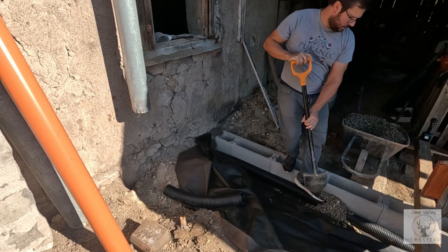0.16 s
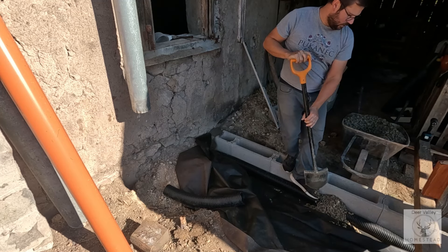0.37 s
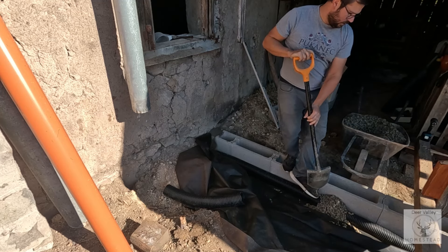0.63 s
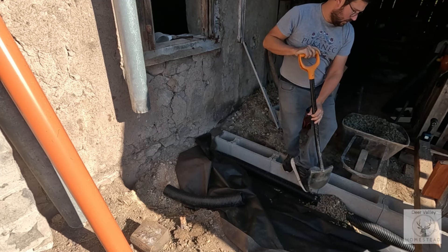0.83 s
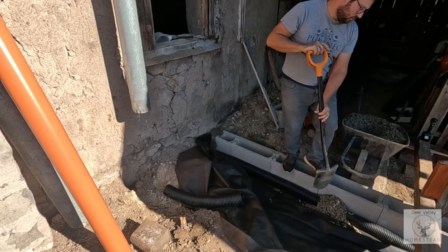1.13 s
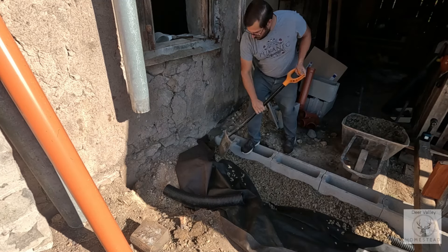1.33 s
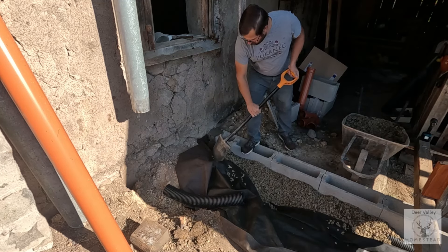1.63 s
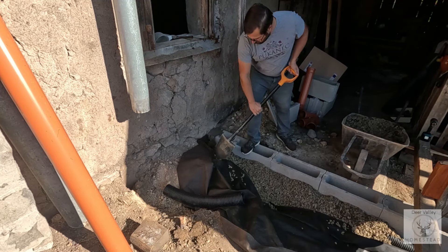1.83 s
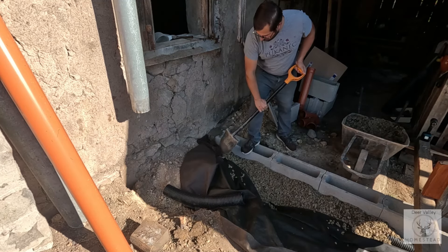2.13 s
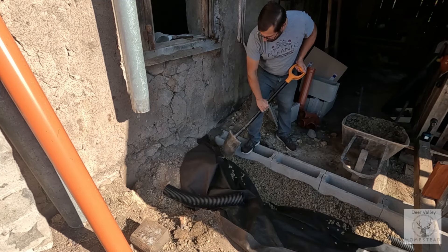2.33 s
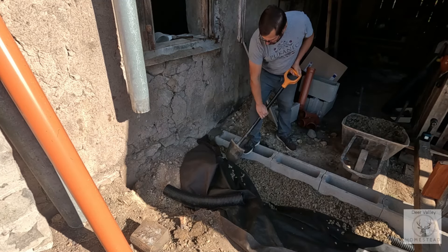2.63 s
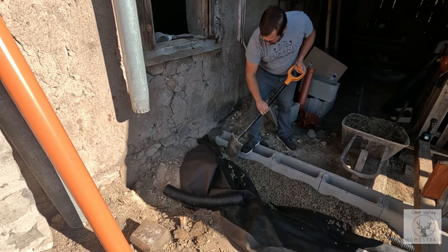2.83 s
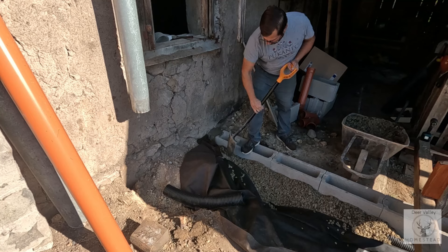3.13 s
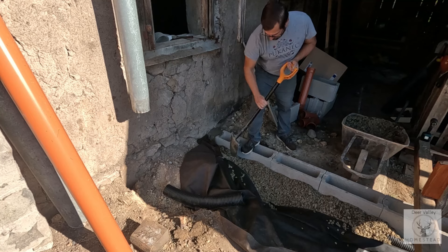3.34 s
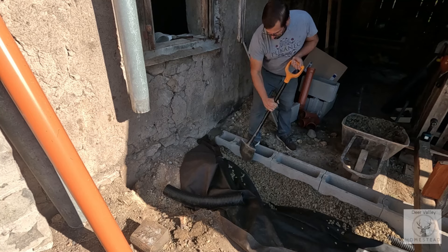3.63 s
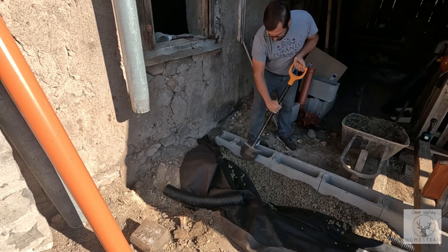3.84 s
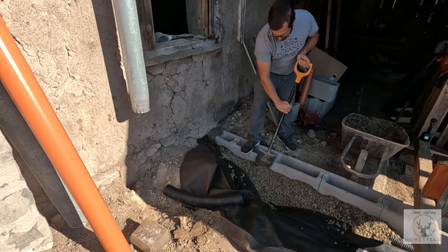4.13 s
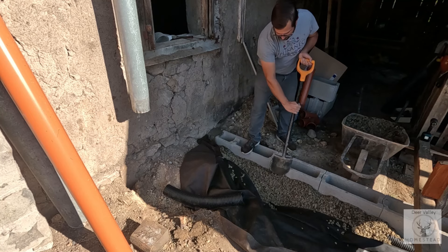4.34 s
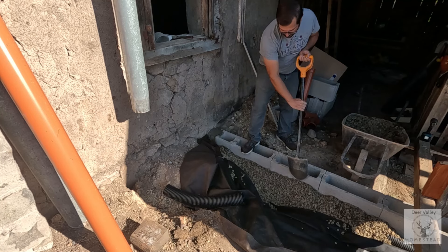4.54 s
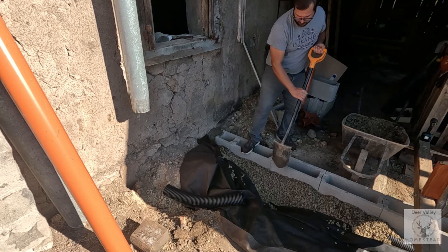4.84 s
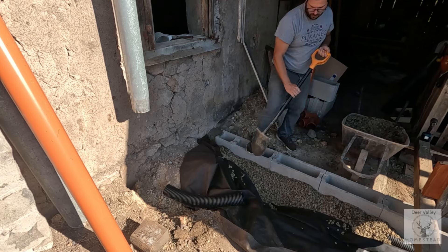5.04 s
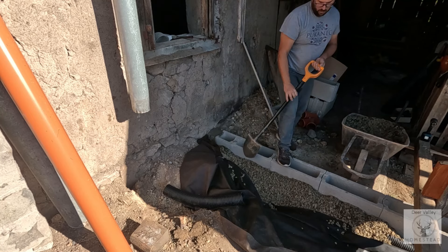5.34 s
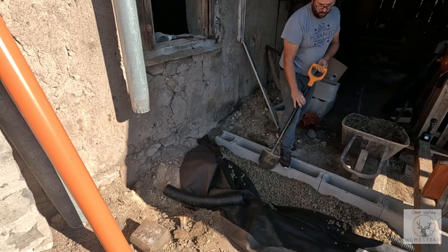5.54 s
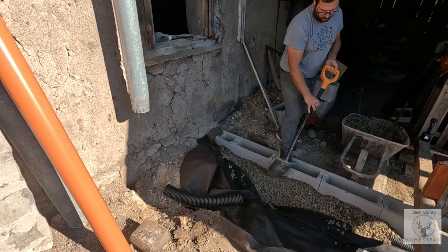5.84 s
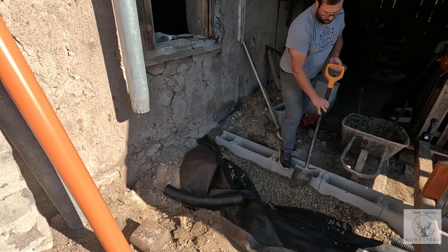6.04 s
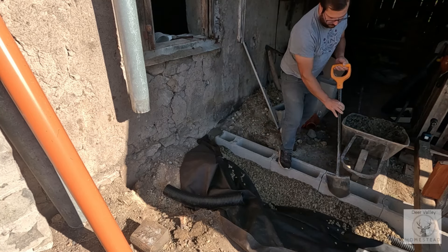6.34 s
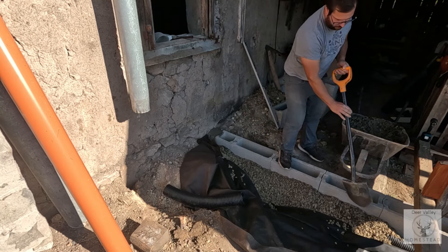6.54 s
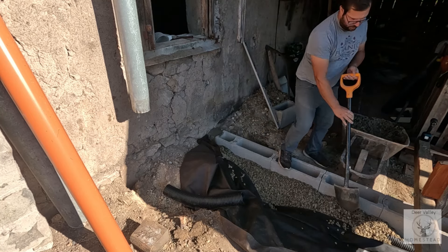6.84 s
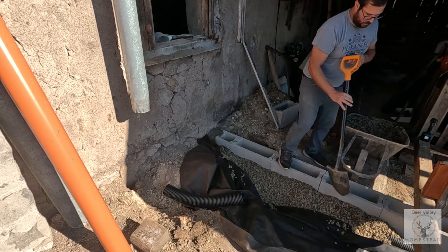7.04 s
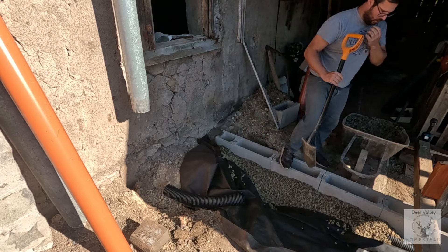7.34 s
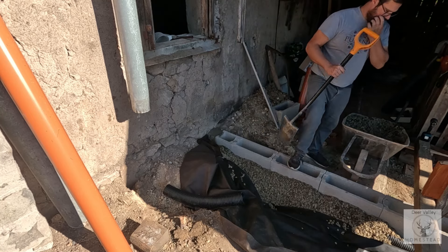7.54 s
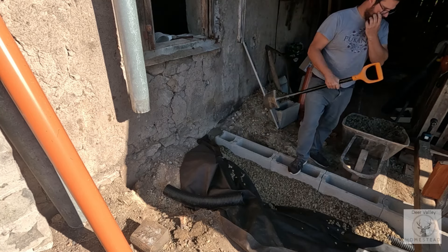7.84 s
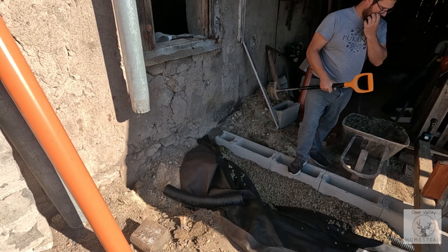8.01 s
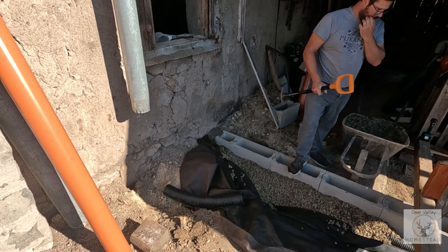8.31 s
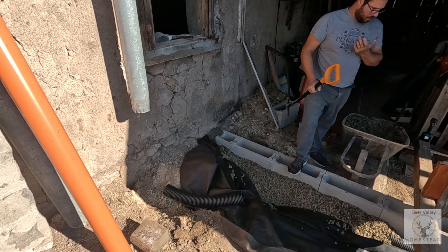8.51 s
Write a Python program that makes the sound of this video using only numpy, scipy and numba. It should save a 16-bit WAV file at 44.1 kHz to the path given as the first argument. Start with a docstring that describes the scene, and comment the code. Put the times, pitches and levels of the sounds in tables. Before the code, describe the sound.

Gravel slides off a steel shovel with a bright rattle, then short scraping strokes spread it, the blade ringing thinly after each in a quiet yard.

```python
"""Shovelling gravel onto a drain pipe

A steel shovel spreads gravel over a plastic pipe in a trench beside a stone wall: bursts of filtered noise
at random contacts make clatter and thud, and drive damped blade modes that ring on once the blade lifts.
Stones knock and drop, pipe and trench thump as decaying sines, a concrete block rocks as short modes.
Fine grit trickles; sparse echoes, a noise hum and one low gust lie behind; a small microphone hears it."""
import sys
import numpy as np
from scipy import signal
from scipy.io import wavfile
from scipy.ndimage import uniform_filter1d
from numba import njit

SR = 44100
rng = np.random.default_rng(int(sys.argv[2]) if len(sys.argv) > 2 else 0)


def file_out(sig):
    """Save sig as 16-bit WAV at sys.argv[1]."""
    # one column per channel
    cols = np.atleast_2d(sig).T
    # limit, then scale
    lim = np.clip(cols, -1, 1)
    pcm = np.round(lim * 32767).astype(np.int16)
    wavfile.write(sys.argv[1], SR, pcm)


N = 382347


def gain_of(db):
    """dB to amplitude gain."""
    return 10 ** (np.asarray(db) / 20)


def evened(x):
    """Scales to rms 1."""
    return x / np.sqrt(np.mean(x ** 2) + 1e-20)


def butter(x, order, hz, kind):
    """Causal Butterworth filter."""
    return signal.sosfilt(signal.butter(order, hz, kind, fs=SR, output="sos"), x)


def coloured(x, spectrum):
    """Minimum-phase filter: its phase is the Hilbert transform of the log gain."""
    hz, db = np.transpose(spectrum)
    bin_hz = abs(np.fft.fftfreq(8192, 1 / SR))
    bin_db = np.interp(np.log(bin_hz + 1), np.log(hz), np.maximum(db, -100))
    log_gain = bin_db * np.log(10) / 20
    impulse = np.fft.ifft(np.exp(np.conj(signal.hilbert(log_gain)))).real[:4096]
    return signal.oaconvolve(x, impulse)[:len(x)]


@njit
def ring(x, hz, t60_s, damping_per_s):
    """One mode as a decaying rotation; damping adds to 1 / t60; a unit click starts a sine of height 1."""
    out, state, turn = np.zeros(len(x)), 0j, np.exp(2j * np.pi * hz / SR)
    for n in range(len(x)):
        loss = np.log(1000) / SR * (1 / t60_s + damping_per_s[n])
        state = state * turn * (1 - loss) + x[n]
        out[n] = state.imag
    return out


def taps(time_s, level_db):
    """Single clicks at the given moments."""
    out = np.zeros(N)
    out[(np.asarray(time_s) * SR).astype(int)] = gain_of(level_db)
    return out


def contacts(per_s, spread_db, clump_db):
    """Random stone contacts, a few much harder, bunched as the heap slips; mean power 1 at any rate."""
    clumps = evened(uniform_filter1d(uniform_filter1d(rng.standard_normal(N), 300), 300))
    hardness = np.minimum(rng.exponential(1, N), 3)
    size = evened(gain_of(spread_db * hardness + clump_db * clumps))
    chance = per_s / SR
    return size * rng.choice([-1, 1], N) * (rng.random(N) < chance) / np.sqrt(chance)


DRIFT_S = .045  # the stones in contact are replaced this often


def stones(clicks, t60_s, rise_s, snap_db=-40, count=12):
    """Each contact is a hard snap plus a short noise burst, one of two stone shapes in play at a time."""
    t, out = np.arange(2000) / SR, np.zeros(N)
    period = (np.arange(N) / SR / DRIFT_S).astype(int)
    shape = (rng.integers(0, count, 1000)[period] + rng.integers(0, 2, N)) % count
    for k in range(count):
        burst = rng.standard_normal(len(t)) * gain_of(-60 * t / t60_s) * (1 - np.exp(-t / rise_s))
        burst = burst / np.linalg.norm(burst) + gain_of(snap_db) * (t == 0)
        out += signal.oaconvolve(clicks * (shape == k), burst / np.linalg.norm(burst))[:N]
    return out


# how each stroke meets the heap: (start [s], blade lifts free [s], blade share [dB], thud [dB],
# treble lift [dB], damping by gravel before the lift [1/s])
STROKES = [(0, 1.29, -1, -21.5, -9, 84), (1.678, 2.134, -4, -23, 2, 6.1),
           (2.605, 2.821, -4, -25.5, 0.5, 23), (2.945, 3.173, -2, -33, 5, 18),
           (3.448, 3.467, 4.5, -18, 15.5, 3.7), (3.93, 4.532, -7.5, -29.5, 4.5, 7.6),
           (5.602, 5.801, -2, -29, 3.5, 7.2), (6.06, 6.248, 1.5, -29, 10.5, 14.5),
           (6.76, 6.904, -6.5, -26, 4, 13.4)]


def per_stroke(values):
    """Holds one value per stroke from its start to the next."""
    index = np.searchsorted(np.transpose(STROKES)[0], np.arange(N) / SR) - 1
    return np.asarray(values)[np.maximum(index, 0)]


# gravel slides off the tipped blade: (time [s], clatter level [dB])
POUR = [(0, -49), (0.266, -41), (0.327, -26.5), (.384, -20), (0.423, -22.5), (0.551, -37.5), (.76, -44.5),
        (1.02, -37.5), (1.25, -62.5)]
# slides pushed or jerked by the blade or trickling after: (start [s], rise [s], hold [s], clatter level [dB])
SHOVES = [(0.813, 0.0056, 0.063, -33.5), (0.903, 0.01, 0.0015, -24), (0.987, 0.0067, 0.004, -25.5),
          (1.681, 0.0045, 0.061, -29.5), (1.784, 0.0054, 0.0092, -36.5), (1.844, 0.0085, 0.036, -31),
          (1.922, 0.0098, 0.064, -33.5), (2.045, 0.012, 0.029, -29.5), (2.13, .005, 0.021, -29),
          (2.607, 0.015, 0.091, -21), (2.73, 0.01, 0.097, -27.5), (2.955, 0.0049, 0.06, -17),
          (3.089, 0.032, 0.059, -32.5), (3.483, .003, 0.002, -24), (3.93, 0.014, 0.095, -25.5),
          (4.006, 0.12, 0.4, -18), (4.551, 0.017, 0.027, -27.5), (4.622, .01, 0.28, -54.5),
          (5.589, 0.016, 0.077, -18), (5.705, 0.012, 0.12, -27.5), (5.81, 0.0083, .002, -29),
          (6.069, 0.014, 0.028, -19), (6.138, 0.021, 0.15, -24), (6.758, 0.0094, 0.059, -18.5),
          (6.847, 0.024, 0.084, -26.5), (6.92, 0.028, 0.032, -34), (7.391, .04, 0.06, -62)]
# clatter stops fast; a fainter settling fades slowly
FALL_DB_PER_S, SETTLE_DB, SETTLE_DB_PER_S = 353, -13.5, 103.5


def clatter_level():
    """Sliding strength: the pour, then each shove's rise, hold, fall and settling; the strongest rules."""
    t, (pour_s, pour_db) = np.arange(N) / SR, np.transpose(POUR)
    out = gain_of(np.interp(t, pour_s, pour_db)) * (t < pour_s[-1])
    for start_s, rise_s, hold_s, db in SHOVES:
        part = out[int(start_s * SR):][:SR]
        since = t[:len(part)]
        after = np.maximum(since - rise_s - hold_s, 0)
        fade_db = np.maximum(-FALL_DB_PER_S * after, SETTLE_DB - SETTLE_DB_PER_S * after)
        shove = np.minimum(since / rise_s, 1) * gain_of(db + fade_db)
        part[:] = np.maximum(part, shove)
    return out


# spectrum of stone on stone: (frequency [Hz], relative density [dB per Hz])
CLATTER = [(400, -61.5), (900, -8), (1400, 0.5), (2700, 7.5), (4500, 0.5), (6450, -6.5), (8890, -24),
           (11000, -14), (14100, -45)]
# spectrum of the heap's dull thud: (frequency [Hz], relative density [dB per Hz])
THUD = [(70, -19), (240, 5), (600, 13), (1100, -23)]


def gravel(level):
    """Clatter of the moving heap, its dull thud in the trench, and the push it gives the blade."""
    blade_db, thud_db, treble_db = per_stroke(STROKES).T[2:5]
    rate_per_s = 146.5 + 1800 * np.tanh(level / .1)  # a slow heap clicks sparsely
    clicks = contacts(rate_per_s, spread_db=2.5, clump_db=2.17)
    clatter = coloured(stones(level * clicks, t60_s=.016, rise_s=.0001, snap_db=-7), CLATTER)
    clatter *= gain_of(-2.5) / np.linalg.norm(coloured(np.eye(1, 4096)[0], CLATTER))
    treble = signal.filtfilt(*signal.butter(1, 6500, "high", fs=SR), clatter)

    lumps = stones(contacts(410, spread_db=8.5, clump_db=1.0), t60_s=.04, rise_s=.0045)
    sliding = signal.lfilter([.002], [1, -.998], level)  # the mass of the heap follows late
    thud = sliding * gain_of(thud_db) * evened(coloured(lumps, THUD))
    push = gain_of(-23 + blade_db) * level * clicks
    return clatter + (gain_of(treble_db) - 1) * treble + thud, push


# stones that strike the blade: (time [s], relative level [dB])
KNOCKS = [(0.64, -19), (0.785, -8.5), (0.837, -5.5), (0.8634, -9), (0.9163, -6), (1.0013, -7), (1.687, -13),
          (1.705, -11), (1.715, -24), (1.732, -18), (1.7547, -15), (1.852, -19.5), (1.869, -14.5),
          (2.1339, -19), (2.1511, -17), (2.7858, -20), (3.02, -11.5), (3.2106, -30.5), (3.47, -25),
          (3.488, -12.5), (3.9439, -7), (4.585, -15.5), (5.822, -5.5), (6.275, -7), (6.3142, -4),
          (6.401, -3), (6.968, -8)]
# loose stones that drop beside the blade: (time [s], relative level [dB])
TICKS = [(.005, -28.5), (0.07, -27), (0.175, -30.5), (0.248, -30), (.305, -11), (.336, -7), (0.423, -5),
         (.579, -18.5), (.687, -23.5), (.715, -22), (1.099, -29), (4.8782, -28), (5.045, -38.5),
         (7.41, -45), (7.4806, -33)]
BLOW_DB = -11.5  # what a knock passes on to the steel


def knocks():
    """Knocks and ticks are thick cracks of stone; knocks also strike the blade."""
    time_s, level_db = np.transpose(KNOCKS)
    hits = taps(time_s, level_db) + taps(*np.transpose(TICKS))
    crack = coloured(stones(hits, t60_s=.016, rise_s=.0003, snap_db=-8), CLATTER)
    click_peak = np.max(abs(coloured(np.eye(1, 4096)[0], CLATTER)))
    return gain_of(1.5) * crack / click_peak, taps(time_s, level_db + BLOW_DB)


# blade modes: (frequency [Hz], undamped t60 [s])
BLADE = [(1123, .24), (1458, .66), (1723, .33), (1847, .62), (1963, .26), (2156, .2), (2320, .22),
         (2536, .2), (2724, .2), (2846, .22), (3286, .15), (3456, .13), (3750, .23), (4080, .24),
         (4236, .27), (4875, .15)]
# answer of each mode while gravel slides over the face: (level [dB])
FACE_DB = [-18.5, -21.5, -13, -22.5, -18.5, -4.5, -18.5, -14, -5.5, -10.5, -10.5, -8, -11.5, -18, -15, -17]
# six spots where the lifted blade is struck, a row each: (level of each mode [dB])
SPOTS_DB = [
    [-34, -32, -15, -34, -8, -25, -10, -8, -9, -8, -25, -2, -25, -9, -2, -22],
    [-30, -16, -14, -17, -14, -25, -14, -18, -21, -13, -15, -10, -16, -25, -14, -23],
    [-16, -7, -8, -13, -23, -12, -23, -23, -21, -23, -23, -23, -20, -15, -11, -25],
    [-38, -42, -34, -27, -38, -26, -20, -38, -10, -14, -38, -38, -28, -38, -22, -38],
    [-18, -28, -17, -17, -22, -14, -27, -30, -13, -27, -27, -15, -15, -16, -7, -24],
    [-32, -16, -15, -32, -14, -16, -20, -32, -8, -27, -10, -14, -30, -30, -9, -27],
]
# spot struck in each stroke: (row of SPOTS_DB)
SPOT_OF_STROKE = [0, 0, 3, 3, 1, 2, 3, 4, 5]
WANDER_DB, WANDER_S = 3.5, .04  # the point of contact keeps moving, so each mode swells and fades
LIFTED_DB = -5  # gravel pushes the steel less once it is lifted


def blade(push, blow):
    """Gravel wakes and damps the steel modes; once lifted, they ring freely by the spot that is struck."""
    _, lift_s, _, _, _, buried_per_s = per_stroke(STROKES).T
    lifted = np.arange(N) / SR >= lift_s
    damping_per_s = buried_per_s * ~lifted
    force = blow + push * np.where(lifted, gain_of(LIFTED_DB), 1)
    at = np.flatnonzero(force)  # moments of contact
    spot = per_stroke(SPOT_OF_STROKE)[at]
    wander_db = rng.standard_normal((500, len(BLADE))).T * WANDER_DB
    modes = np.zeros(N)
    for (hz, t60_s), face_db, spots_db, drift_db in zip(BLADE, FACE_DB, np.transpose(SPOTS_DB), wander_db):
        moving_db = face_db + np.interp(at / SR / WANDER_S, np.arange(len(drift_db)), drift_db)
        drive = np.zeros(N)
        drive[at] = force[at] * gain_of(np.where(lifted[at], spots_db[spot], moving_db))
        modes += ring(drive, hz, t60_s, damping_per_s)
    return butter(modes, 2, 600, "high")  # the ringing steel carries no bass


# hollow thumps of pipe and trench: (time [s], level [dB], pitch [Hz])
THUMPS = [(.6385, -24.5, 653), (.837, -18, 704), (0.9186, -23.5, 440), (1.0021, -21, 668),
          (3.0199, -19.5, 270), (3.278, -20, 310)]
HOLLOW_T60_S = .036


def thumps():
    """Pipe and trench thump at listed moments, as short, low, decaying sines that start softly."""
    out, t = np.zeros(N), np.arange(SR // 5) / SR
    for time_s, db, hz in THUMPS:
        envelope = gain_of(db - 60 * t / HOLLOW_T60_S) * (1 - np.exp(-t / .004))
        out[int(time_s * SR):][:len(t)] += envelope * np.sin(2 * np.pi * hz * t)
    return out


# concrete block modes: (frequency [Hz], level [dB], t60 [s])
BLOCK = [(1594, 0, .06), (2280, -1, .045), (3310, -7, .035), (4000, -15, .03)]
# the block rocks underfoot: (time [s], level [dB])
ROCKS = [(3.264, -37), (3.284, -34), (3.3109, -31), (3.32, -28), (3.337, -30)]
# the block scrapes dully on the ground: (start [s], length [s], level [dB])
GRIND = (3.258, 0.16, -40)


def block():
    """Short gritty taps ring the hollow concrete over a dull scrape of low noise."""
    hits = stones(taps(*np.transpose(ROCKS)), t60_s=.0081, rise_s=.00076)
    modes = sum(gain_of(db) * ring(hits, hz, t60_s, 0 * hits) for hz, db, t60_s in BLOCK)
    scrape = evened(butter(rng.standard_normal(N), 2, [200, 480], "band"))
    return butter(modes, 2, 1000, "high") + swell(*GRIND) * scrape


def swell(start_s, length_s, db):
    """A smooth hump of level, early-peaked."""
    phase = np.clip((np.arange(N) / SR - start_s) / length_s, 0, 1)
    return gain_of(db) * np.sin(np.pi * phase ** 0.28) ** 2


def grit(level):
    """Fine grit keeps trickling for a while after each stroke, in thin bright ticks."""
    keep = np.exp(-1 / (.12 * SR))  # 0.12 s lag
    after = signal.lfilter([1 - keep], [1, -keep], level) ** .5
    clicks = after * contacts(per_s=270, spread_db=5.5, clump_db=6.0)
    ticks = stones(clicks, t60_s=.008, rise_s=.00024)
    return gain_of(-46.0) * butter(ticks, 2, [2500, 12500], "band")


def wall(x, t60_s):
    """Sparse decaying echoes of random sign from wall, blocks and doorway."""
    echoes, at = np.zeros(SR // 2), np.arange(200, SR // 2 - 20, 20)
    echoes[at + rng.integers(0, 20, len(at))] = rng.choice([-1., 1.], len(at))
    echoes *= gain_of(-60 * np.arange(len(echoes)) / SR / t60_s)
    return signal.oaconvolve(x, echoes / np.linalg.norm(echoes))[:N]


# spectrum of the yard hum: (frequency [Hz], relative density [dB per Hz])
YARD = [(59, -56), (100, -15), (198, -4), (319, -5.5), (750, -3), (4500, -16.5), (8500, -29), (11000, -34),
        (14100, -35)]
YARD_DB = -61.5
# a low breeze on the microphone: (start [s], level [dB], time to fade by 20 dB [s])
GUST = (7.8, -57, 0.42)


def yard():
    """Distant hum of noise with drifting time-frequency patches, and one low, fading gust."""
    real, imag, patches = rng.standard_normal((N // 256 + 5, 513, 3)).T
    patches = evened(uniform_filter1d(uniform_filter1d(patches, 10, 0), 14, 1))
    bins = (real + 1j * imag) * gain_of(1.2 * patches)
    noise = signal.istft(bins, nperseg=1024, noverlap=768)[1][:N]
    hum = evened(coloured(noise, YARD))

    start_s, db, fade_s = GUST
    since = np.arange(N) / SR - start_s
    rumble = evened(butter(rng.standard_normal(N), 2, 200, "low"))
    gust = rumble * gain_of(db - 20 * abs(since) / fade_s) * (since > 0)
    return gain_of(YARD_DB) * hum + gust


# left-right difference made from faint echoes: (frequency [Hz], gain on the echoes [dB])
APART = [(60, -9.5), (180, -21.5), (530, -25.5), (1560, -59.5), (4610, -44), (13600, -6.5)]


def scene():
    """Both channels share all sources; faint echoes set them apart, most at the lowest and highest pitches."""
    level = clatter_level()
    (heap, push), (crack, blow) = gravel(level), knocks()
    near = heap + crack + blade(push, blow) + thumps() + block() + grit(level)
    common = near + gain_of(-9.5) * wall(near, t60_s=.048) + yard()
    apart = coloured(wall(common, t60_s=.028), APART)
    return np.array([common + apart, common - apart])


EDGE_HZ = 14255


def record(dry):
    """Soft clipping, bass cut, a narrow dip from the microphone port, then the band limit."""
    clipped = .8 * np.tanh(dry / .8)
    thin = butter(clipped, 2, 140, "high")
    dipped = signal.lfilter(*signal.iirnotch(9000, 9, SR), thin)
    low_pass = signal.firwin(255, EDGE_HZ, window=("kaiser", 9), fs=SR)
    return signal.oaconvolve(dipped, low_pass[None], "same")


dry = scene()
out = record(dry)
file_out(out)
```